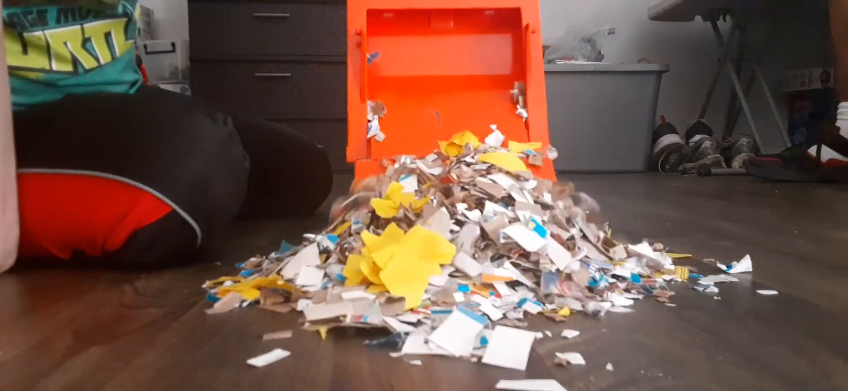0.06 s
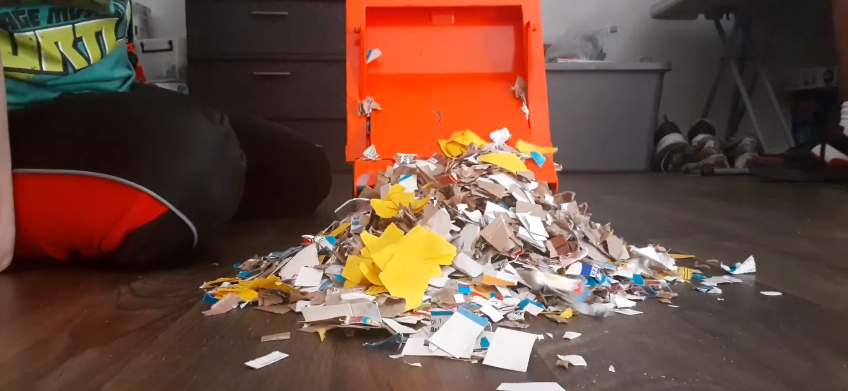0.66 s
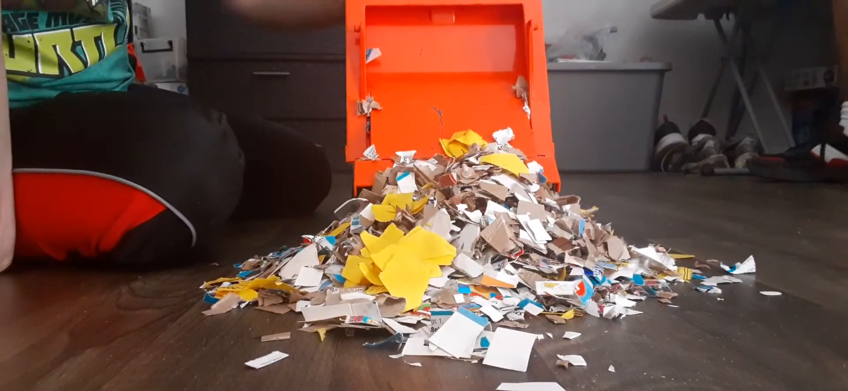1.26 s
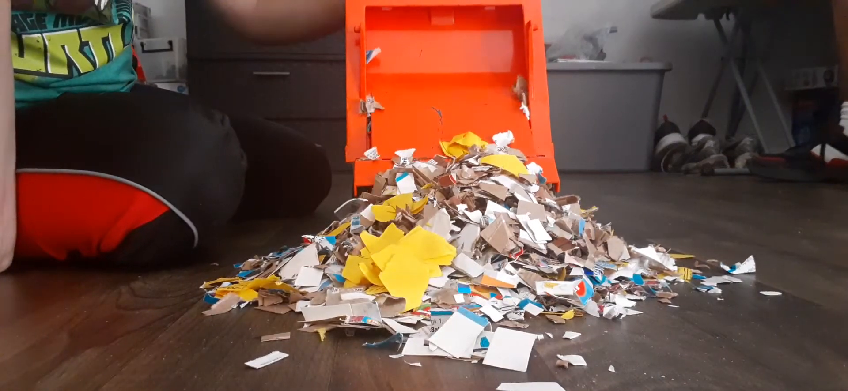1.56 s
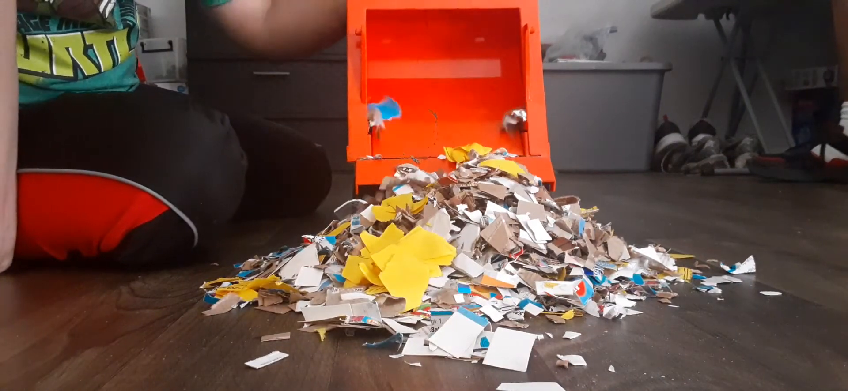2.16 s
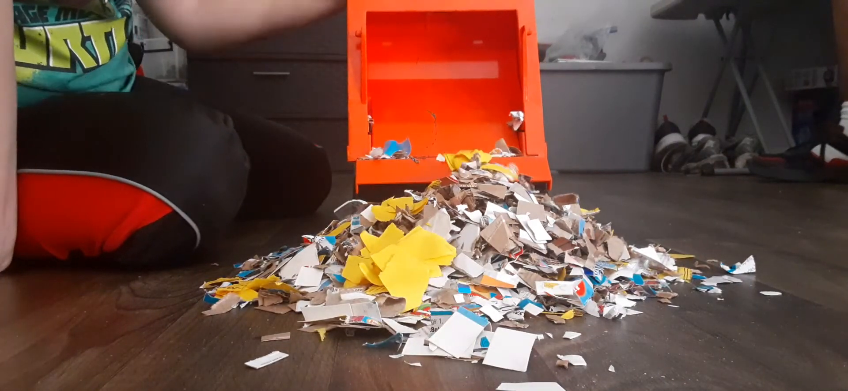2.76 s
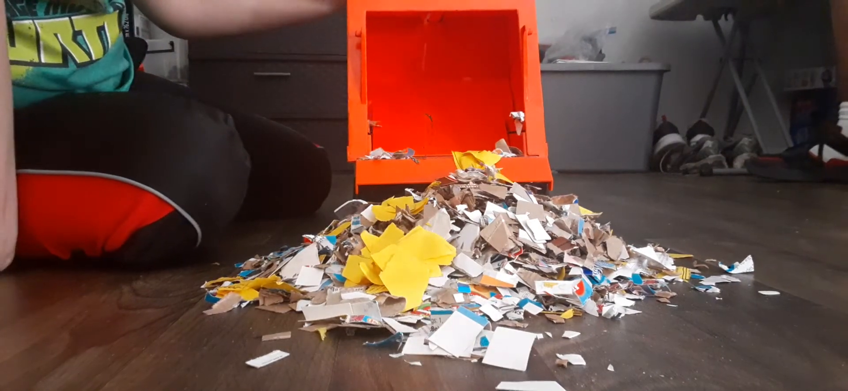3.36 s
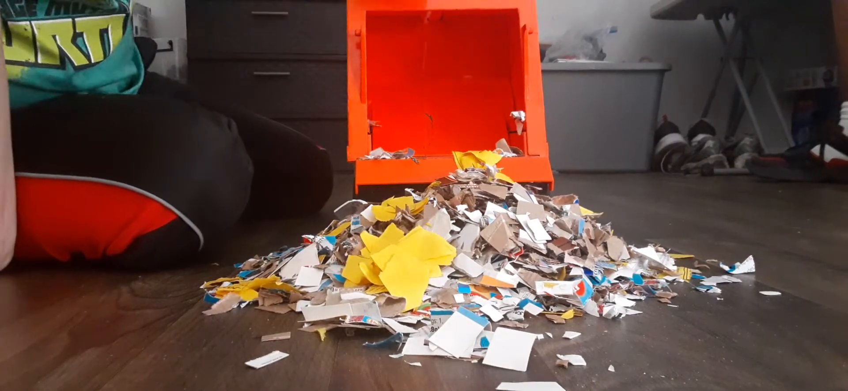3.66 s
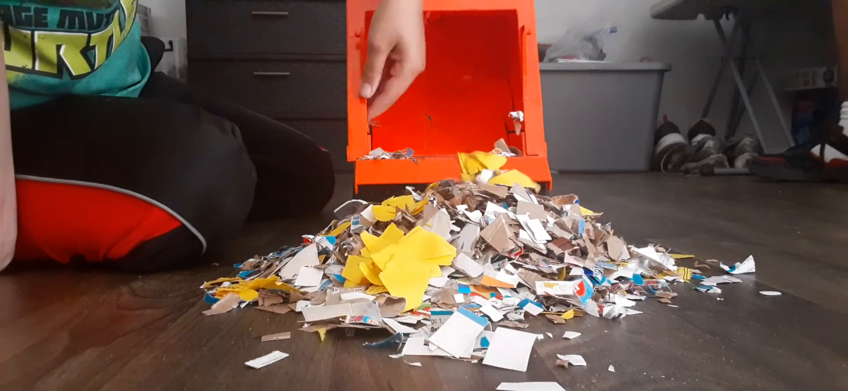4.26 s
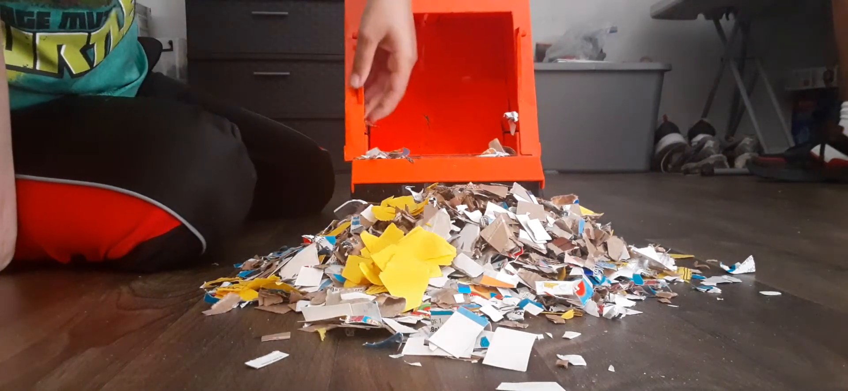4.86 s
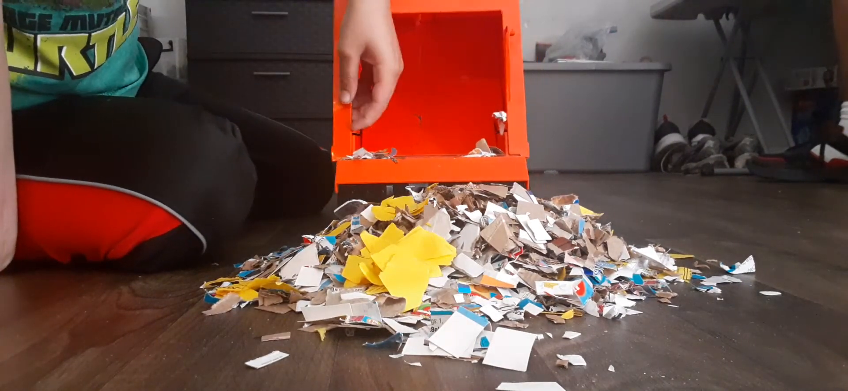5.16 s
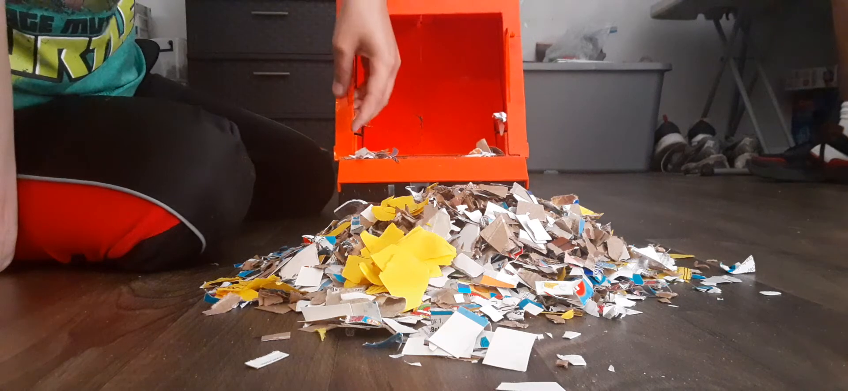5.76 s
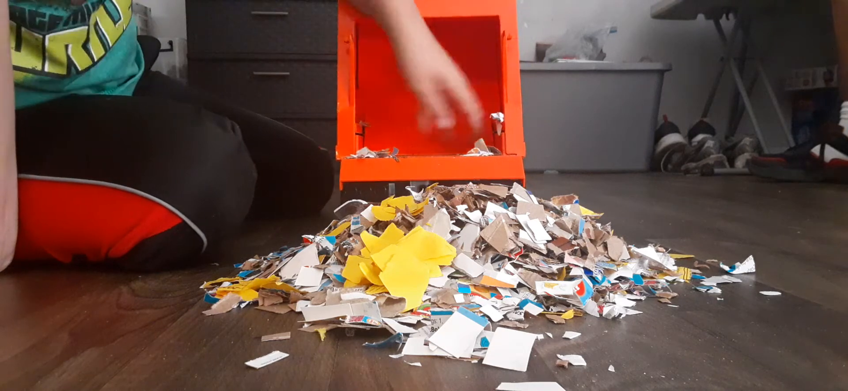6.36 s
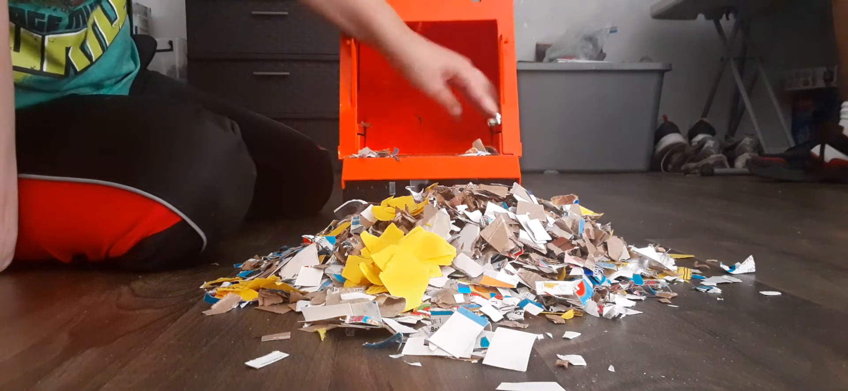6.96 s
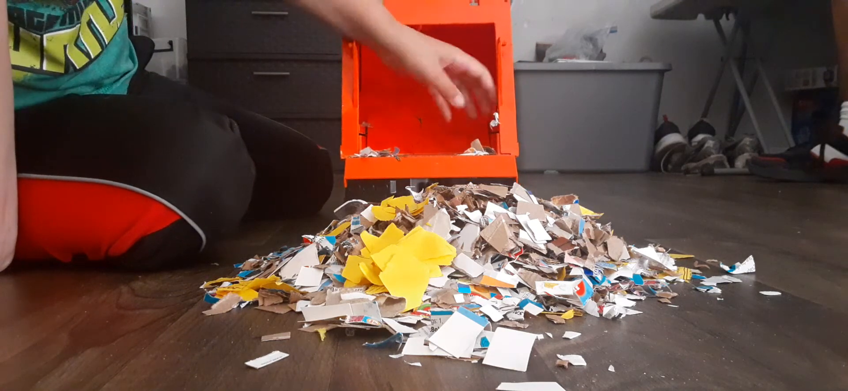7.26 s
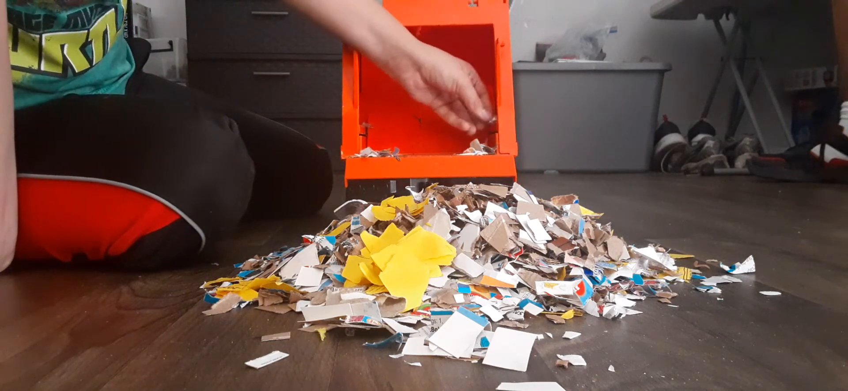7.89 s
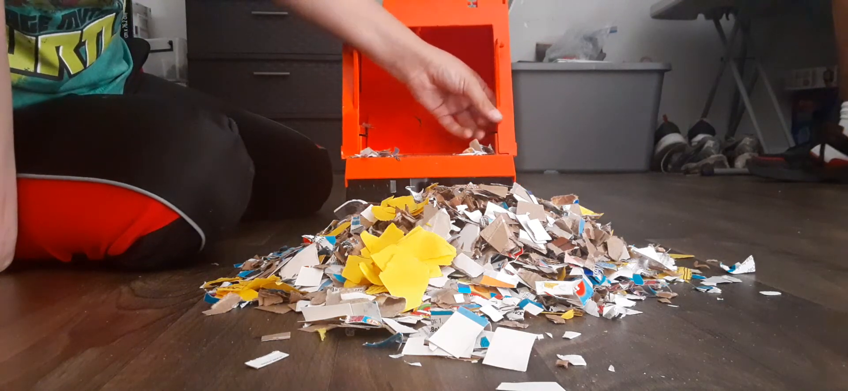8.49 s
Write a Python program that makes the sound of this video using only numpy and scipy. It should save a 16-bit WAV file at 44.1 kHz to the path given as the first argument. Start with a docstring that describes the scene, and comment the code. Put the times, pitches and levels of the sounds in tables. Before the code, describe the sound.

Close by in a small, quiet room, paper scraps pour with a soft rustle while a hollow plastic bin clacks and the wooden floor gives a dull thump. The knocks grow busier, leading to a short burst of sliding paper. Afterwards fingers scrape and brush the plastic walls for the last pieces, with scattered taps, light crackles and a run of soft floor thuds over a faint hiss.

```python
"""In a small room with a wooden floor, shredded paper and card slide out of a tipped plastic toy truck bin.
The scraps crackle and hiss as they brush past each other onto a heap. The bin is rattled and swings back,
then a hand rubs and picks at the last scraps inside it. Taps, scrapes and knocks make the hollow
plastic ring, soft bumps make the floor thump dully, and the room adds a short echo."""
import sys
import numpy as np
from scipy import signal
from scipy.fft import rfft, irfft, next_fast_len
from scipy.io import wavfile

SR = 44100
rng = np.random.default_rng(int(sys.argv[2]) if len(sys.argv) > 2 else 0)


def dump(signal):
    """Clip the signal to [-1, 1] and save it as 16-bit WAV at the path in sys.argv[1]."""
    limited = np.clip(np.atleast_2d(signal).T, -1, 1)
    pcm = np.round(limited * 32767).astype(np.int16)
    wavfile.write(sys.argv[1], SR, pcm)


N = 384993
TIME_S = np.arange(N) / SR
SWING_BACK_S = 3.3  # the bin is tipped until this moment, and rings differently after it


def amp(db):
    """Turns decibels into a number to multiply a sound by."""
    return 10 ** (np.asarray(db) / 20)


def evened(x):
    """Scales a sound so that its average power is 1."""
    return x / np.sqrt(np.mean(x ** 2) + 1e-24)


def read(points, hz):
    """Looks up a value between the rows of a table, with pitch spaced in octaves."""
    row_hz, value = np.transpose(points)
    return np.interp(np.log(hz + 1), np.log(row_hz + 1), value)


def add(mix, start_s, sound):
    """Adds a sound to the mix at its start time."""
    part = mix[:, max(round(start_s * SR), 0):][:, :sound.shape[-1]]
    part += sound[..., :part.shape[1]]


def bins(size):
    """Lists the frequencies in the spectrum of a sound that is size samples long."""
    return np.fft.rfftfreq(size, 1 / SR)


def causal(gain):
    """Turns a gain for each pitch into a filter that rings only after it is struck."""
    log_gain = np.log(np.maximum(gain, 1e-6))
    mirrored = np.r_[log_gain, log_gain[-2:0:-1]]
    return np.exp(np.conj(signal.hilbert(mirrored)))[:len(gain)]


def resonance(hz, pitch_hz, width):
    """A filter that favours one pitch; width is a fraction of that pitch."""
    return 1 / (1 + 1j * (hz / pitch_hz - pitch_hz / (hz + 1)) / width)


def contacts(size, per_s, spread_db):
    """Tiny random touches, many faint and a few strong, reaching both microphones together."""
    strength = amp(spread_db * np.minimum(rng.exponential(1, size), 4))
    return strength * (rng.random(size) < per_s / SR) * rng.standard_normal((2, size))


# How alike left and right are for nearby sounds: pitch_hz, likeness (1 = the same, 0 = unrelated)
NEAR_LIKENESS = [(450, 1), (640, 0.86), (1400, 0.72), (3100, 0.42), (7000, -0.04), (11000, 0)]
# The same for the background and the echo: pitch_hz, likeness
FAR_LIKENESS = [(100, 0.92), (300, 0.91), (640, 0.48), (1400, 0), (4000, 0)]
def stereo(spectra, hz, table=NEAR_LIKENESS):
    """Blends two unrelated spectra into what the left and right microphones hear."""
    likeness = np.clip(read(table, hz), -.99, .99)
    shared = spectra[0] * np.sqrt((1 + likeness) / 2)
    apart = spectra[1] * np.sqrt((1 - likeness) / 2)
    return np.array([shared + apart, shared - apart])


def sliding(crackle, tone, power):
    """Gives a stream of touches its tone, and makes its power follow the motion."""
    size = next_fast_len(N + SR, True) // 2 * 2
    hz = bins(size)
    spectrum = stereo(rfft(crackle, size), hz) * causal(tone(hz))
    return evened(irfft(spectrum)[:, :N]) * np.sqrt(power)


# The tone of the quiet room: pitch_hz, gain_db
AIR_TONE = [(25, -20), (64, -2.5), (125, -0.5), (190, -13), (350, -16), (600, -27), (1200, -27.5),
            (1600, -38), (5000, -36), (7000, -46), (9300, -43), (12500, -28), (15800, -36)]
def air(hiss_db=-60, whine_db=-86, whine_hz=6000):
    """The steady background: low rumble, thin hiss and a faint, fuzzy high whine."""
    hz = bins(N)
    noise = stereo(rfft(rng.standard_normal((2, N))), hz, FAR_LIKENESS)
    hiss = irfft(noise * amp(read(AIR_TONE, hz)), N)
    whine = irfft(rfft(rng.standard_normal((2, N))) / (1 + ((hz - whine_hz) / 90) ** 2), N)
    return amp(hiss_db) * evened(hiss) + amp(whine_db) * evened(whine)


# The tone of sliding paper: pitch_hz, gain_db
PAPER_TONE = [(88, -38), (150, -21), (347, 2.5), (464, -12), (713, -8), (974, -12), (1090, -8.5),
              (1360, -16), (1440, -10.5), (1680, -11), (2390, -9), (4810, -14), (11600, -13.5),
              (15800, -10)]
# Batches of paper that give way, then settle: peak_s, level_db, settle_s
PAPER_SLIDES = [(0, -44.5, 0.17), (.32, -50.5, 0.11), (.7, -56, 0.17), (.92, -55.5, 0.49),
                (1.53, -59.5, 0.48), (2.08, -50.5, 0.61), (2.76, -54, 0.12), (2.92, -46.5, .1),
                (3.0, -37.5, 0.073), (3.52, -62, .12), (3.92, -61, 0.23), (4.19, -52.5, 0.19),
                (4.4, -49, 0.1), (4.72, -63, 1), (5.32, -63.5, 0.24), (5.8, -61, 0.28), (6.5, -55, 0.12),
                (6.99, -47, 0.18), (7.48, -58.5, 0.35), (8.1, -62.5, 0.13)]
def paper(give_way_s=0.11, flick_s=0.0048, tint_db=11, hiss_db=-4, spurt_db=1.0):
    """Scraps of many sizes flick against each other, each size in its own spurts, over a fine hiss."""
    t, crackle = np.arange(512) / SR, np.zeros((2, N))
    for scrap_hz in np.geomspace(1300, 14000, 14):  # one pitch for each size of scrap
        flick = rng.standard_normal((2, len(t))) * np.exp(-t / flick_s)
        tint = amp(tint_db * np.exp(-(2 * np.log2((bins(len(t)) + 1) / scrap_hz)) ** 2))
        flick = irfft(rfft(flick) * causal(tint))
        drift = np.interp(np.arange(N), np.linspace(0, N, 120), rng.standard_normal(120))
        touches = contacts(N, per_s=110, spread_db=3.2) * amp(spurt_db * drift)
        crackle += signal.oaconvolve(touches, evened(flick), axes=1)[:, :N]
    rustle = evened(crackle) + amp(hiss_db) * rng.standard_normal((2, N))
    power = np.zeros(N)
    for peak_s, level_db, settle_s in PAPER_SLIDES:
        speed_up = np.clip(1 + (TIME_S - peak_s) / give_way_s, 0, 1)
        settle = np.exp(-np.maximum(TIME_S - peak_s, 0) / settle_s)
        power += (amp(level_db) * speed_up * settle) ** 2
    return sliding(rustle, lambda hz: amp(read(PAPER_TONE, hz)), power)


# The notes that the plastic bin rings at: pitch_hz, width_hz, tipped_db, swung_back_db
BIN_NOTES = [(231, 18, 13, -17), (282.6, 14, 16.5, -7), (350.5, 28.5, 16.5, 17), (381.7, 17.5, 3, 11.5),
             (415, 21, -5, 7), (551.6, 79, -2.5, 10.5), (695.7, 105, 7.5, 5), (762, 60, -6, 9.5),
             (891, 99, 13.5, 4), (1094, 45, 15, 14.5), (1156, 43, 2, -1), (1251, 28, 14.5, 14),
             (1437, 68, 9.5, 4.5), (1630, 41, 4.5, -48), (1790, 20, 12, 4), (1983, 35, 9, 9.5),
             (2158, 150, 7, 8), (2345, 47, 10.5, 6.5), (2540, 105, 7, 3.5), (3030, 120, 5, -4.5),
             (4350, 140, 2, -13.5)]
def bin_gain(hz, tipped):
    """The hollow bin boosts its own notes, by amounts that depend on how it rests."""
    peaks = sum(amp(tipped_db if tipped else back_db) ** 2 / (1 + (2 * (hz - pitch_hz) / width_hz) ** 2)
                for pitch_hz, width_hz, tipped_db, back_db in BIN_NOTES)
    return np.sqrt(1 + peaks)


# The tone of a hit before the bin adds its notes: pitch_hz, gain_db
HIT_TONE = [(100, 8), (250, -6), (500, -4.5), (1000, -9.5), (2000, -12.5), (4000, -12), (6000, -14),
            (9600, -16), (11600, -15), (15500, -19.5)]
# The four parts of a hit (hollow, clack, crack and tick): low_hz, high_hz
HIT_BANDS = [(220, 600), (600, 1700), (1700, 5000), (5000, 16000)]
def hit_bin(rise_s, decay_s, level_db, tilt_db, clack_db, spot_hz, spot_db=8, size=16384):
    """One hit: a snap and a dying chatter of loose plastic set the bin ringing."""
    t, hz = np.arange(size) / SR, bins(size)
    force = np.minimum(t / rise_s, 1) * np.exp(-np.maximum(t - rise_s, 0) / decay_s)
    chatter = contacts(size, per_s=14000, spread_db=2) * force
    chatter /= np.linalg.norm(chatter) + 1e-12
    chatter[:, round(rise_s * SR / 3)] += 0.25 * np.exp(-rise_s / 0.02)  # sudden hits snap more
    spot = 1 + (amp(spot_db) - 1) * resonance(hz, spot_hz, width=0.069)  # the struck spot's own note
    # Tilt brightens the hit, in dB per octave; clack turns down the lowest and highest bands.
    octaves = np.log2(np.sqrt(np.prod(HIT_BANDS, axis=1)) / 1000)
    bands_db = level_db + tilt_db * octaves - clack_db * np.array([1, 0, 0, 1])
    top_slope_db = 0.35 * np.clip(bands_db[-1] - bands_db[-2], -16, 2)  # blunt hits lose more treble
    top = amp(top_slope_db * np.log2(np.maximum(hz / 6800, 1)))
    return stereo(rfft(chatter), hz) * spot * top, bands_db


def ring_bin(hits, size=16384):
    """Plays each hit through the bin, tipped or swung back, and sets the level of its four bands."""
    hz, out = bins(size), np.zeros((2, N))
    body = {tipped: causal(amp(read(HIT_TONE, hz)) * bin_gain(hz, tipped)) for tipped in (False, True)}
    bands = [causal(1 / np.sqrt((1 + (low_hz / (hz + 1)) ** 8) * (1 + (hz / high_hz) ** 12)))
             for low_hz, high_hz in HIT_BANDS]
    for start_s, (spectrum, bands_db) in hits:
        ringing = spectrum * body[start_s < SWING_BACK_S]
        ring = sum(amp(db) * evened(irfft(ringing * band)) for db, band in zip(bands_db, bands))
        add(out, start_s, ring * np.sqrt(0.026 * SR / size))  # level as if the hit lasted 26 ms
    return out


# Soft taps on the bin: start_s, decay_s, level_db, tilt_db_per_octave
SOFT_TAPS = [(0.075, 0.014, -58, -1.5), (.433, 0.02, -64.5, -5), (0.601, 0.043, -59.5, 1.5),
             (1.587, 0.045, -55, -0.5), (2.233, 0.0025, -65.5, -9.5), (2.772, 0.0047, -61.5, -5),
             (2.889, 0.0015, -66, -12.5), (3.02, 0.0022, -53, -5.5), (3.147, 0.018, -51.5, -4),
             (5.038, 0.0099, -61.5, -1.4), (5.197, 0.013, -54, -5.5), (5.454, 0.015, -55, -2.5),
             (5.892, 0.015, -60.5, -4), (6.01, 0.012, -59, -3.5), (6.051, 0.0021, -59.5, -4.5),
             (6.545, 0.05, -58, -2.5), (6.75, 0.054, -53, -4), (6.859, 0.011, -64.5, -4),
             (7.362, 0.034, -59.5, -3.5), (7.458, 0.041, -62, -1.8), (7.574, .019, -61.5, -2),
             (7.504, 0.0057, -63.5, 0), (7.703, 0.0035, -72.5, 1.4), (7.817, 0.012, -59.5, 0),
             (8.043, 0.027, -73, -16), (8.12, 0.012, -64, -5), (8.297, 0.0078, -66, -5.5)]
def taps(rise_s=0.00305, clack_db=-5.5, tipped_hz=336, back_hz=402):
    """A finger or a clump of card taps the wall: mostly hollow boom and scuff, with little clack."""
    hits = []
    for start_s, decay_s, level_db, tilt_db in SOFT_TAPS:
        wall_hz = tipped_hz if start_s < SWING_BACK_S else back_hz
        hits.append((start_s, hit_bin(rise_s, decay_s, level_db, tilt_db, clack_db, wall_hz, spot_db=4.5)))
    return ring_bin(hits)


# Single soft wipes: start_s, length_s, level_db, pitch_hz
SOFT_WIPES = [(0.095, 0.23, -60.5, 2400), (4.742, 0.15, -65, 1000), (4.894, 0.25, -64, 2620),
              (5.308, 0.099, -64.5, 2350), (6.795, 0.045, -54, 10900), (6.94, 0.15, -52.5, 8100),
              (7.338, 0.048, -57.5, 9600), (7.405, 0.13, -56, 11600), (7.643, 0.025, -53.5, 11600)]
def wipes(size=16384):
    """A scrap or a finger brushes past: a hiss around one broad note swells and fades."""
    t, hz, out = np.arange(size) / SR, bins(size), np.zeros((2, N))
    for start_s, length_s, level_db, pitch_hz in SOFT_WIPES:
        friction = stereo(rfft(contacts(size, per_s=5000, spread_db=4)), hz)
        hiss = evened(irfft(friction * resonance(hz, pitch_hz, width=0.84) ** 2))
        swell = np.sin(np.pi * np.minimum(t / length_s, 1))
        add(out, start_s, amp(level_db) * hiss * swell)
    return out


# Short scrapes on the bin: start_s, rise_s, decay_s, level_db, tilt_db_per_octave, pitch_hz
SHORT_SCRAPES = [(.305, 0.015, .03, -49, -6, 1000), (1.994, 0.0065, 0.068, -51, 3.2, 365),
                 (3.509, 0.0071, 0.03, -49, -1, 1110), (3.887, .015, 0.034, -47.5, -4, 430),
                 (4.223, 0.0026, 0.062, -52, 0, 1170), (4.447, 0.0062, 0.023, -52.5, -5, 400),
                 (5.111, .016, 0.0061, -40.5, -0.75, 525), (5.722, 0.012, 0.0059, -43, 1, 2480)]
def scrapes(clack_db=4):
    """Each scrape swells until the plastic lets go."""
    return ring_bin((start_s, hit_bin(rise_s, decay_s, level_db, tilt_db, clack_db, pitch_hz))
                    for start_s, rise_s, decay_s, level_db, tilt_db, pitch_hz in SHORT_SCRAPES)


# Hard knocks on the bin: start_s, decay_s, level_db, tilt_db_per_octave, clack_db, pitch_hz
HARD_KNOCKS = [(.322, 0.024, -54, 3.5, 12, 367), (.452, 0.0092, -55.5, -2.5, 12, 233),
               (.563, 0.0068, -48.5, -3.5, -0.5, 273), (.582, 0.024, -46, -2, 1.5, 567),
               (0.646, 0.0078, -46.5, -0.5, 2.5, 1610), (.94, .012, -55, -12, 29, 940),
               (.969, 0.037, -48.5, -6, 15, 1840), (1.037, 0.007, -45, 4, 21, 1980),
               (1.161, 0.015, -40.5, -3.5, 3, 419), (1.301, 0.0083, -43.5, -.3, 9, 770),
               (1.399, 0.0053, -49.5, -10.5, 15, 610), (1.744, 0.02, -47.5, -9, 12.5, 900),
               (1.94, 0.015, -39, -4.5, 8, 980), (1.977, 0.034, -38.5, -2.5, -0.5, 2760),
               (2.317, .024, -49.5, 0, 6, 364), (2.398, 0.011, -46, -10, 12.5, 1640),
               (2.41, 0.0069, -43, 0, 17, 1670), (2.424, 0.037, -47, 0, 0, 760),
               (2.494, 0.0067, -38, -5, 24, 1100), (2.566, 0.0058, -56.5, -3, -4, 231),
               (2.601, 0.0087, -42.5, -5, 0.5, 365), (2.658, 0.079, -51, -2, 4.5, 411),
               (2.685, 0.0064, -51, -2, 9, 2950), (2.831, 0.0081, -56.5, 6.5, 25, 4000),
               (2.976, 0.0032, -41.5, -9, 4, 543), (3.046, 0.0033, -43, 0.5, -8, 7800),
               (3.071, 0.0057, -42.5, -1.5, 3.5, 3130), (3.091, .009, -41.5, -1.5, 1.5, 905),
               (3.452, 0.088, -53, -11, 9.5, 620), (3.521, .021, -42, 0, 15.5, 2300),
               (4.159, 0.0092, -63.5, 4.5, 12, 3520), (4.39, 0.0071, -43.5, -9, 12, 1090),
               (4.842, 0.0048, -57, -4, 11, 2930), (5.195, .006, -64, 4.5, -6, 13200),
               (5.469, 0.0097, -51.5, -1, 8, 470), (5.754, 0.029, -42, -3, 2, 443),
               (6.182, 0.0043, -55, -11, 7.5, 1380), (6.431, 0.016, -53.5, -2, -5, 620),
               (6.883, .008, -61.5, 2, 11, 4600), (7.073, 0.0074, -49, 2, 9, 1700),
               (7.106, 0.0048, -47.5, 1.5, 6, 3200), (7.118, 0.034, -47.5, -1, 3, 2270)]
def knocks(rise_s=0.0025):
    """Plastic knocks against plastic, and the hollow bin clacks."""
    return ring_bin((start_s, hit_bin(rise_s, *knock)) for start_s, *knock in HARD_KNOCKS)


# Soft bumps that reach the floorboards: start_s, level_db, pitch_hz, rise_s, decay_s
FLOOR_BUMPS = [(0.568, -47, 100, 0.009, 0.017), (.62, -47, 61, .022, 0.017),
               (0.739, -58, 116.6, 0.014, 0.2), (1.018, -23.5, 97, 0.016, 0.023),
               (1.686, -35.5, 89.2, 0.026, 0.018), (1.963, -40, 154, 0.025, .013),
               (2.131, -49, 96.3, 0.01, .06), (3.013, -46, 155.4, 0.0089, .08),
               (5.454, -47, 93, 0.019, 0.03), (5.746, -41.5, 107, 0.013, 0.039),
               (6.014, -35.5, 110, 0.02, 0.012), (6.092, -34.5, 101.4, .01, .012),
               (6.118, -33, 99.6, .021, 0.023), (6.285, -27.5, 105, 0.023, 0.0087),
               (6.507, -35, 106, 0.02, 0.02), (6.673, -28.5, 99, 0.026, 0.013),
               (6.761, -44.5, 106, .015, 0.025), (7.444, -48, 91, 0.017, 0.025),
               (7.883, -44.5, 95, .02, 0.03), (8.504, -40.5, 70, 0.019, 0.031)]
def floor_thumps(roughness=0.11, rumble_db=-20.5, rumble_decay_s=0.1):
    """A soft push makes the floor swing at a low note; the other boards rumble on faintly."""
    t, out = np.arange(SR // 2) / SR, np.zeros((2, N))
    for start_s, level_db, pitch_hz, rise_s, decay_s in FLOOR_BUMPS:
        swell = np.sin(np.pi / 2 * np.minimum(t / rise_s, 1)) ** 2
        fading_s = np.maximum(t - rise_s, 0)
        near_pitch = signal.butter(2, [pitch_hz * .5, pitch_hz * 1.8], "band", fs=SR, output="sos")
        boards = evened(signal.sosfilt(near_pitch, rng.standard_normal(len(t))))
        swing = (np.sin(2 * np.pi * pitch_hz * t) + roughness * boards) * np.exp(-fading_s / decay_s)
        rumble = amp(rumble_db) * boards * np.exp(-fading_s / rumble_decay_s)
        add(out, start_s, amp(level_db) * swell * (swing + rumble))
    return out


# The tone of rubbing before the bin adds its notes: pitch_hz, gain_db
RUB_TONE = [(60, -5), (130, 4.5), (250, -5), (450, -0.5), (700, -2.5), (1200, -13.5), (2500, -17),
            (6000, -26), (15000, -31.5)]
# Strokes along the bin's walls: start_s, length_s, level_db
RUB_STROKES = [(0.753, .3, -61), (1.05, 0.16, -53.5), (1.386, 0.33, -52), (2.028, 0.31, -48),
               (2.434, 0.25, -49.5), (2.896, 0.13, -40.5), (4.064, 0.98, -61.5), (4.374, 0.12, -51.5),
               (4.94, 0.22, -52), (5.224, 0.35, -53), (5.703, 0.15, -52.5), (6, 0.14, -51),
               (6.465, 0.081, -48.5), (6.964, .1, -44), (7.112, 0.15, -51), (7.297, 0.68, -60.5),
               (8.084, 0.28, -60), (8.482, 0.13, -60.5)]
def rubbing(fade_s=0.093):
    """Card, and later fingers, stick and slip along the walls; each stroke fades in and out."""
    slips, power = contacts(N, per_s=1800, spread_db=3), np.zeros(N)
    for start_s, length_s, level_db in RUB_STROKES:
        inside_s = np.minimum(TIME_S - start_s, start_s + length_s - TIME_S)
        power += amp(level_db) ** 2 * np.clip(.5 + inside_s / fade_s, 0, 1)
    tipped = sliding(slips, lambda hz: amp(read(RUB_TONE, hz)) * bin_gain(hz, tipped=True), power)
    back = sliding(slips, lambda hz: amp(read(RUB_TONE, hz)) * bin_gain(hz, tipped=False), power)
    return np.where(TIME_S < SWING_BACK_S, tipped, back)


def groan(start_s=4.16, length_s=0.25, level_db=-57.5, pitch_hz=206, width_hz=14):
    """The bin groans as it is nudged along: a faint, unsteady low note swells and fades."""
    narrow_band = 1 / (1 + ((bins(N) - pitch_hz) / width_hz) ** 2)
    note = evened(irfft(rfft(rng.standard_normal(N)) * narrow_band, N))
    swell = np.sin(np.pi * np.clip((TIME_S - start_s) / length_s, 0, 1))
    return amp(level_db) * swell * note


# How long the echo takes to fall by 60 dB: pitch_hz, fade_s
ECHO_FADE = [(100, 0.47), (300, 0.11), (800, 0.2755), (2500, 0.21), (6000, 0.35), (14000, 0.01)]
# How strong the echo is: pitch_hz, gain_db
ECHO_TONE = [(100, 6.5), (300, 0), (1000, -5), (3000, -1), (12000, -8.5)]
def room_echo(sound, delay_s=0.0045, size=32768):
    """Sound bounces off the floor and furniture, and each pitch dies away at its own speed."""
    hz, t, noise = signal.stft(rng.standard_normal((2, size)), SR, nperseg=256)
    fade_s = read(ECHO_FADE, hz)[:, None]
    noise *= amp(read(ECHO_TONE, hz)[:, None] - 60 * t / fade_s)
    noise *= np.sqrt(2 * np.log(1000) / (fade_s * SR))  # a longer fade adds no extra energy
    tail = signal.istft(noise, SR, nperseg=256)[1][:, :size] * (np.arange(size) / SR > delay_s)
    tail = irfft(stereo(rfft(tail), bins(size), FAR_LIKENESS))
    return signal.fftconvolve(sound, tail, axes=1)[:, :N]


def scene(paper_db=-1, hit_db=-0.5, thump_db=3.5, rub_db=-4.5):
    """Mixes bin, paper, echo, floor and background; these gains add to the levels in the tables."""
    hits = knocks() + taps() + scrapes()
    near = amp(hit_db) * hits + amp(paper_db) * paper() + amp(rub_db) * rubbing() + wipes()
    return near + room_echo(near) + amp(thump_db) * floor_thumps() + groan() + air()


# How much more the left microphone hears than the right: pitch_hz, left_minus_right_db
LEFT_LEAN = [(60, 6), (110, 3), (200, 1.5), (380, 3.5), (700, -0.5), (1290, 4), (2380, 0.5), (4400, 1.5),
             (8120, 1.5), (15000, -2)]
def record(dry, low_cut_hz=43, high_cut_hz=15950):
    """The microphones lose the deepest bass and highest treble, and the left hears a little more."""
    hz = bins(N)
    lean_db = read(LEFT_LEAN, hz)
    balance = amp(np.array([lean_db, -lean_db]) / 2)
    low_cut = 1 / np.sqrt(1 + (low_cut_hz / (hz + 1)) ** 6)
    high_cut = signal.firwin(511, high_cut_hz, window=("kaiser", 9), fs=SR)
    heard = irfft(rfft(dry) * low_cut * balance, N)
    return signal.oaconvolve(heard, high_cut[None], "same")


dry = scene()
out = record(dry)
dump(out)
```